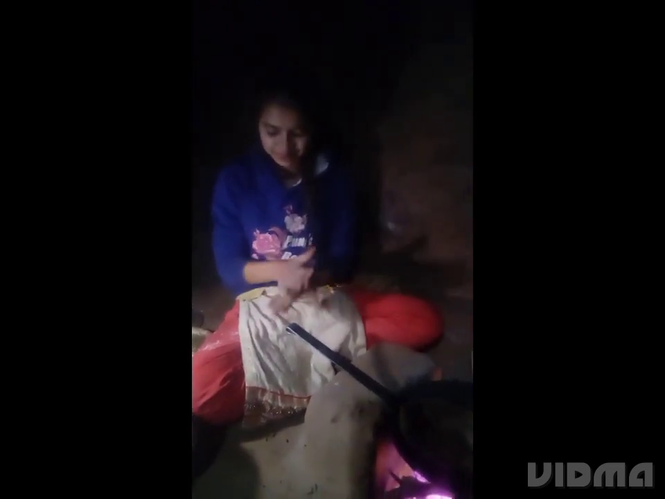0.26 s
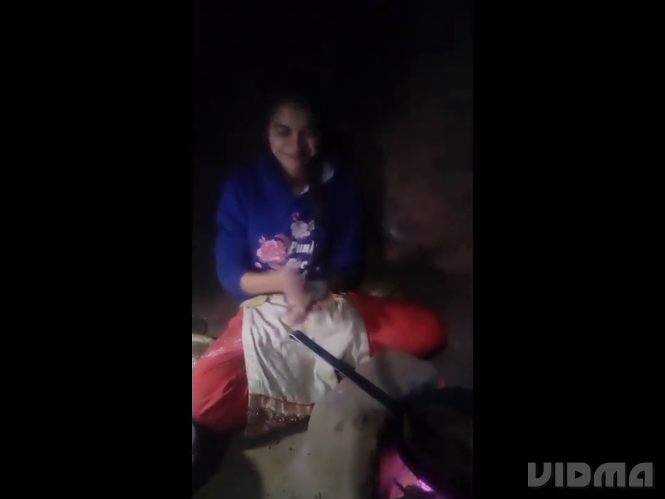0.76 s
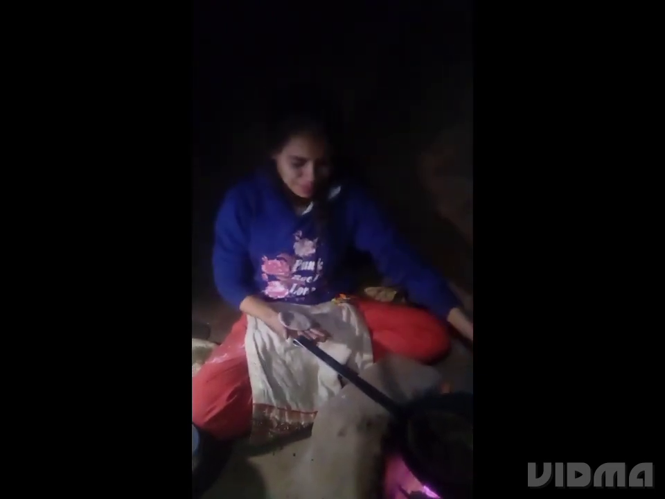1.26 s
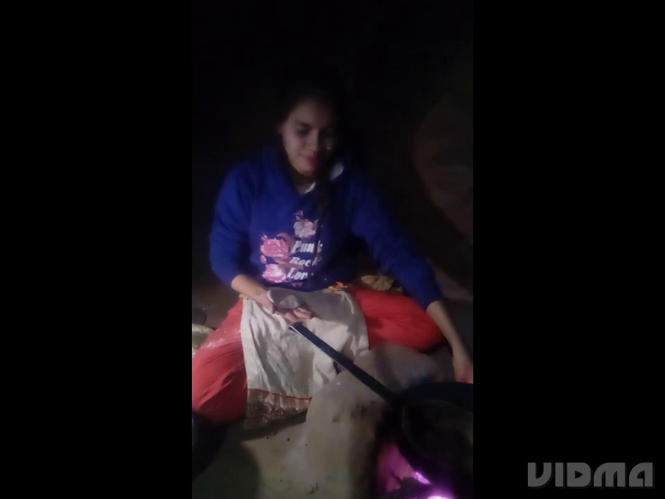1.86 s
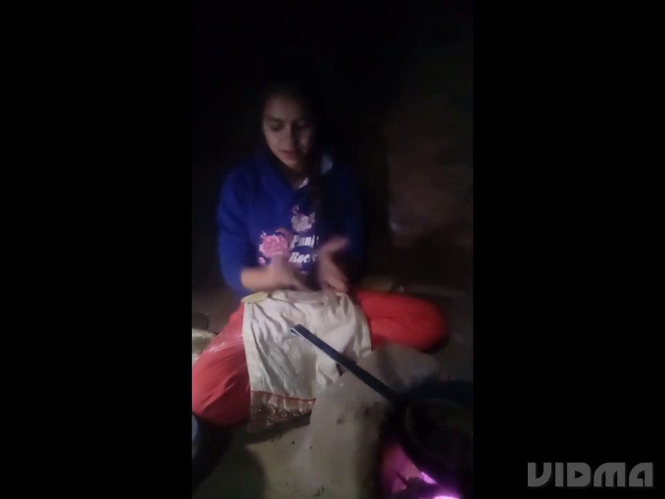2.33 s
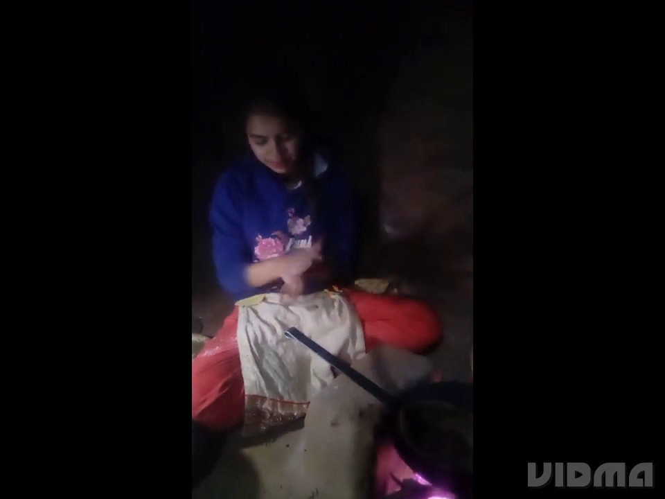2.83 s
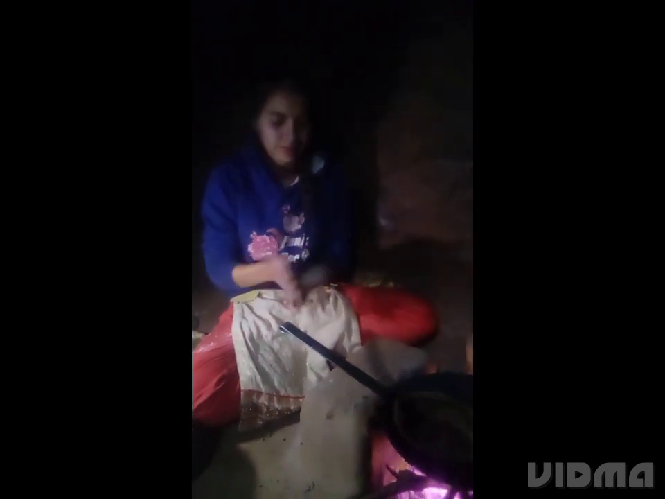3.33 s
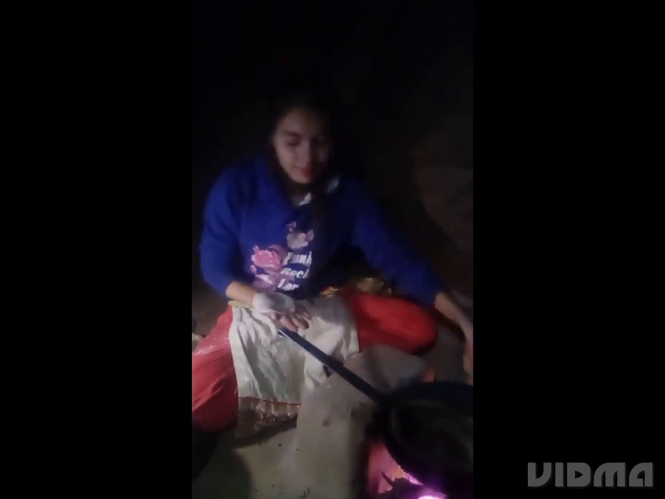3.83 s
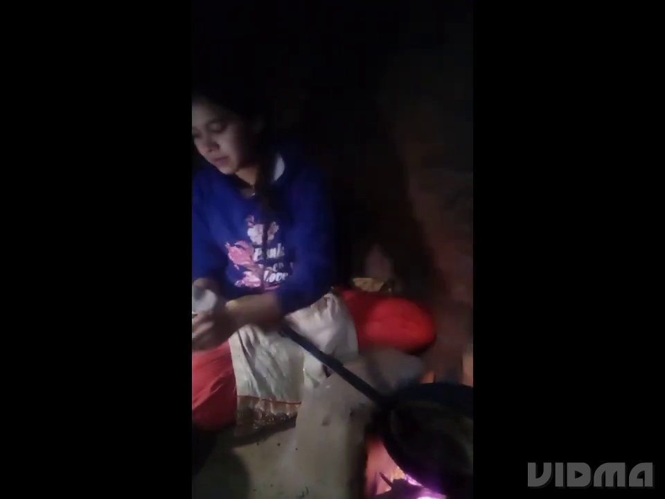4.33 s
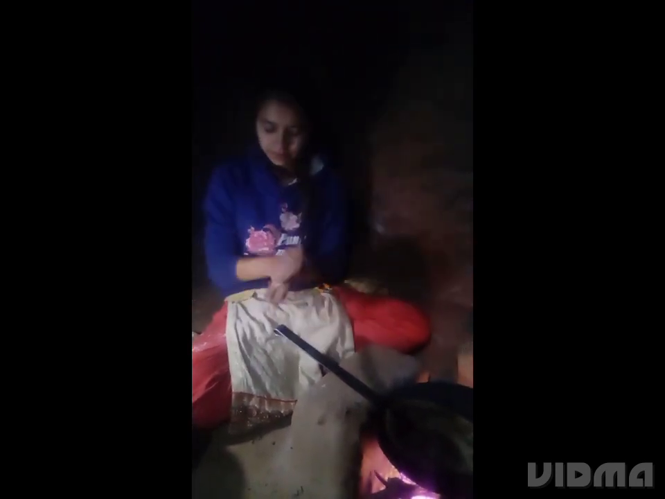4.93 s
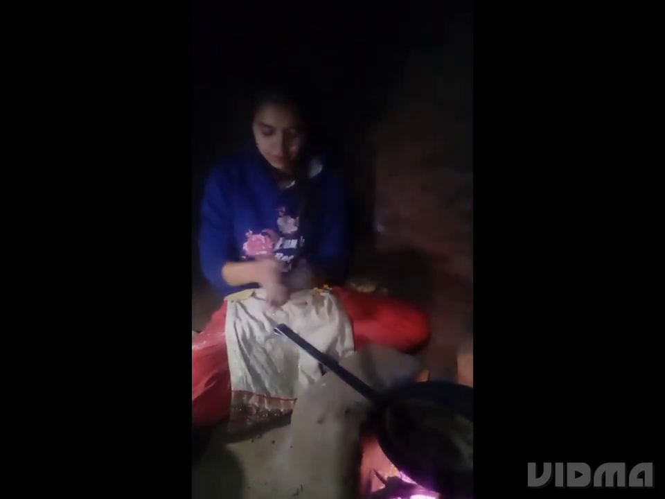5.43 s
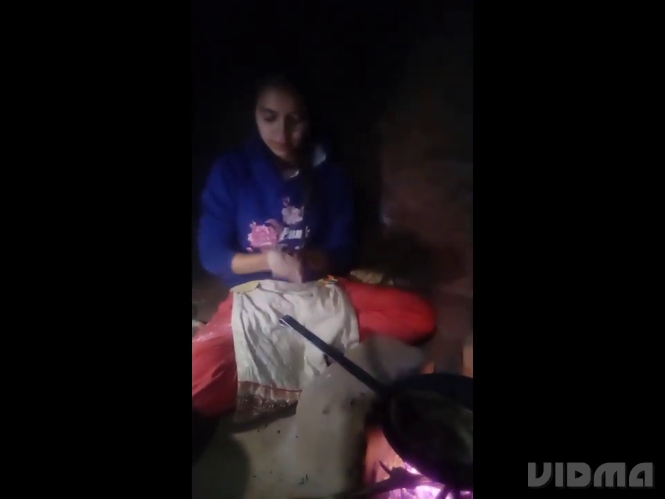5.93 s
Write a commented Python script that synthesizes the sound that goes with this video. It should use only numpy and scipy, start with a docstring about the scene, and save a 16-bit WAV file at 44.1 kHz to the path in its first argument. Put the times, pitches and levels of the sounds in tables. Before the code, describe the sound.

Close, nearly dry sound in a small quiet kitchen. Dough is patted between two floury palms about eight times a second, each pat a brief brushing hiss with occasional light slaps. The pats thin out as a hand reaches away with dull rubbing, resume, break once more, then continue firmer with soft low thumps. A wood fire murmurs and snaps sparsely.

```python
"""In a small quiet kitchen, a ball of dough is patted flat from palm to palm beside a wood fire.
Each pat is a hissing brush of skin over floury dough, made of clumped noise; firm contacts add slaps that
ring trapped air, and cupped palms add soft low thumps that bounce and sway. Twice a hand reaches away with
a dull rubbing. The fire murmurs and snaps as gas pockets burst; a short room tail follows."""
import sys
import numpy as np
from scipy import signal
from scipy.io import wavfile
from scipy.ndimage import uniform_filter1d

SR = 44100
rng = np.random.default_rng(int(sys.argv[2]) if len(sys.argv) > 2 else 0)


def log_audio(samples):
    """Write samples as a 16-bit WAV file to the path given in sys.argv[1]."""
    # one column per channel
    frames = np.atleast_2d(samples).T
    # limit to full scale, then quantise
    limited = np.clip(frames, -1, 1)
    pcm = np.round(limited * 32767).astype(np.int16)
    wavfile.write(sys.argv[1], SR, pcm)


N = 272538  # length in samples

# dough landing in a cupped palm: t/s, relative level/dB, central pitch f/Hz
THUMPS = [(1.156, -53, 76), (1.188, -48, 104), (1.418, -40, 106), (1.7, -43.5, 137.4),
          (1.951, -28.5, 174.7), (2.126, -46.5, 128.4), (2.255, -47, 156), (2.401, -31.5, 141.6),
          (2.934, -33, 105.5), (2.95, -37.5, 190), (3.304, -29.5, 181.5), (3.542, -35.5, 104.6),
          (4.434, -33.5, 185), (4.588, -35, 141), (4.654, -45.5, 183), (4.752, -24, 179),
          (4.869, -30.5, 158), (5.033, -40, 157), (5.103, -39.5, 332), (5.198, -23, 179.6),
          (5.321, -30, 167.6), (5.638, -26, 161.7), (5.746, -29, 181.4), (6.095, -30.5, 180)]
# bright hiss of skin on floury dough: f/Hz, relative density/dB
HISS = [(400, -20.5), (1000, -23), (1800, -3), (2600, -0.5), (3700, -6), (4300, -14), (5200, -31.5),
        (6800, -48), (8000, -60)]


def amp(db):
    """Decibels to gain."""
    return 10 ** (np.asarray(db) / 20)


def unit(x):
    """Scales to an rms of 1."""
    return x / np.sqrt(np.mean(x ** 2) + 1e-20)


def read(points, hz):
    """Joins points by straight lines over log frequency."""
    f, value = np.transpose(points)
    return np.interp(np.log(hz + 1), np.log(f + 1), value)


def add(mix, s, sound):
    """Lays a sound into the mix at time s."""
    part = mix[max(round(s * SR), 0):][:len(sound)]
    part += sound[:len(part)]


def colour(x, spectrum, size=4096):
    """Causal (minimum-phase) filter of unit energy with the given spectrum."""
    hz = abs(np.fft.fftfreq(size, 1 / SR))
    log_gain = np.log(amp(read(spectrum, hz)))
    response = np.exp(np.conj(signal.hilbert(log_gain)))
    taps = np.fft.ifft(response).real[:size // 2]
    return signal.oaconvolve(x, taps / np.linalg.norm(taps))[:len(x)]


def resonate(x, hz, width_hz):
    """One resonance with a peak gain of 1."""
    return signal.lfilter(*signal.iirpeak(hz, hz / width_hz, SR), x)


def grains(count, clumping_db=3.0, size=40):
    """Noise whose strength varies in clumps about size samples long, like grit under skin."""
    clumps = unit(uniform_filter1d(rng.standard_normal(count), size))
    return unit(rng.standard_normal(count) * amp(clumping_db * clumps))


def stroke(length, rise, sag_db, release):
    """Envelope of a contact: it builds, sags while it lasts, and dies when the hand lifts (times in s)."""
    t = np.arange(SR // 4) / SR
    held = np.minimum(t / length, 1)
    lifted = np.maximum(t - length, 0)
    return (1 - np.exp(-(t / rise) ** 2)) * amp(sag_db * (.5 - held) - 60 * lifted / release)


def room(x, size=256):
    """A short tail of sparse reflections, each band dying at its own speed."""
    # decay of the room: f/Hz, time to fall by 60 dB/s
    decay_times = [(60, 0.9), (200, 0.29), (600, 0.092), (2500, 0.11), (6000, 0.12)]
    count = SR // 2
    taps = rng.choice([-1, 1], count) * (rng.random(count) < 2500 / SR)  # about 2500 reflections a second
    taps[:SR // 250] = 0  # none within the first 4 ms
    hz, t, bands = signal.stft(taps, SR, nperseg=size)
    fade = amp(-60 * t / read(decay_times, hz)[:, None])
    tail = signal.istft(bands * fade, SR, nperseg=size)[1]
    return signal.fftconvolve(x, tail / np.linalg.norm(tail))[:N]


def ambience(level_db=-68, flutter_db=3.5):
    """The low, gently wavering murmur of the fire and the room: coloured noise with a drifting level."""
    # murmur: f/Hz, relative density/dB
    murmur_spectrum = [(25, -10), (60, 2), (170, 0), (290, -12.5), (500, -6.5), (650, -15.5), (1100, -15),
                       (1800, -17.5), (3400, -30), (5000, -46), (15000, -55)]
    waver = uniform_filter1d(rng.standard_normal(N), size=3000)
    waver = unit(uniform_filter1d(waver, size=1500))
    return amp(level_db + flutter_db * waver) * unit(colour(rng.standard_normal(N), murmur_spectrum))


def fire(echo_s=0.0009, echo=0.58, fizz_db=-21, fizz_t60=0.027):
    """A gas pocket bursts in the wood: a pulse, its rebound, and a short fizz."""
    # snaps of the burning wood: t/s, relative level/dB
    snap_events = [(1.464, -40), (1.727, -32.5), (1.7651, -22.5), (2.122, -38), (2.4682, -25),
                   (2.61, -15.5), (3.2228, -36.5), (3.378, -18), (3.9459, -32), (4.732, -18), (5.001, -36),
                   (5.247, -18), (5.3589, -30.5)]
    # snap: f/Hz, relative density/dB
    snap_spectrum = [(80, -19.5), (500, -6.5), (900, -10), (1550, 4), (2200, -5), (2850, 0), (3500, -8.5),
                     (4500, -11.5), (6000, -33.5), (8300, -53), (15000, -51.5), (16200, -65.5)]
    out, t = np.zeros(N), np.arange(SR // 20) / SR
    for s, db in snap_events:
        pop = amp(fizz_db - 60 * t / fizz_t60) * rng.standard_normal(len(t))
        pop[0] -= 1  # the pulse
        pop += echo * np.sinc((t - echo_s) * SR)  # the rebound, of opposite sign
        add(out, s, amp(db) * pop)
    return amp(11.5) * colour(out, snap_spectrum)


def scuffs(landing_db=-29, landing_s=0.0099, wander=0.033):
    """Dull, lumpy rubbing: one broad resonance that shifts from stroke to stroke, under a faint fizz."""
    # separate short scuffs: t/s, length/s, relative level/dB
    short_scuffs = [(1.951, 0.01, -33), (2.025, 0.021, -41), (2.783, 0.14, -60), (4.581, .018, -43),
                    (5.274, 0.047, -50.5), (5.571, 0.043, -58.5), (5.701, 0.019, -51), (5.895, .03, -46.5)]
    # rubbing of hand, flour and cloth, one curve for each reach of the arm: t/s, level/dB
    reach_curves = [
        [(1.37, -54.5), (1.49, -62.5), (1.59, -51), (1.625, -61.5), (1.67, -41.5), (1.78, -62.5), (1.85, -59),
         (1.91, -76), (2.0, -59), (2.1, -50), (2.17, -55.5), (2.21, -43), (2.27, -69)],
        [(3.74, -75.5), (3.77, -48.5), (3.82, -76), (3.9, -60.5), (3.99, -51), (4.04, -75.5)],
    ]
    # scuff: f/Hz, relative density/dB
    scuff_spectrum = [(60, -4), (280, -16), (400, 2), (500, 3.5), (640, -0.5), (850, -11), (1300, -19.5),
                      (3500, -35), (5500, -76.5)]
    # each landing of the dough also scuffs the palm, landing_db relative to its thump
    landings = [(s, landing_s, db + landing_db) for s, db, _ in THUMPS]
    strokes = []
    for s, length, db in list(short_scuffs) + landings:
        strokes.append((s, amp(db) * stroke(length, rise=0.0027, sag_db=4.0, release=0.076)))
    for curve in reach_curves:
        s, db = np.transpose(curve)
        t = np.arange(s[0], s[-1], 1 / SR)
        strokes.append((s[0], amp(np.interp(t, s, db))))
    out = np.zeros(N)
    for s, pressure in strokes:
        shift = 1 + wander * (2 * rng.random() - 1)  # up to 3.3 % either way
        shifted = [(f * shift, level) for f, level in scuff_spectrum]
        rub = colour(pressure * grains(len(pressure), clumping_db=4.0, size=400), shifted)
        add(out, s, unit(rub) * np.sqrt(np.mean(pressure ** 2)))  # keeps the rms of the pressure
    return out


def fingers(per_s=5, top_db=-72, spread_db=3.0):
    """Faint stray touches of the fingertips at random times: grainy noise with the hiss of the pats."""
    pressure = np.zeros(N)
    for when, length, strength in rng.random((round(per_s * N / SR), 3)):
        touch = stroke(0.014 + 0.1 * length, rise=0.0078, sag_db=9, release=0.067)
        touch_db = top_db + spread_db * (2 * strength - 2)
        add(pressure, when * N / SR, amp(touch_db) * touch)
    return colour(pressure * grains(N, clumping_db=6.5), HISS)


def thumps(sway_hz=61, sway_t60=0.28, ring_t60=0.11, ring_db=-14, glide=0.046, wobble=0.053,
           flesh_db=-10, flesh_t60=0.037):
    """The soft mass bounces unevenly in the palm, its pitch sinking, and leaves a deep sway behind."""
    # flesh noise of a landing: f/Hz, relative density/dB
    flesh_spectrum = [(40, -10.5), (130, 8.5), (270, -2.5), (420, -4), (800, -19.5), (2000, -24),
                      (5000, -82)]
    base_hz, base_s, stretch = 170, 0.024, 0.94  # push length up to that pitch; exponent of growth above it
    base_sway_db, sway_db_per_oct = -38, -1  # sway at base_hz; lower landings sway more
    out, t = np.zeros(N), np.arange(SR // 3) / SR
    for s, db, hz in THUMPS:
        length = base_s * max(hz / base_hz, 1) ** stretch
        push = np.minimum(t / length, 1)
        ring = amp(ring_db) * push * amp(-60 * np.maximum(t - length, 0) / ring_t60)
        swell = abs(np.sin(np.pi * push ** 0.71)) + ring
        wander = unit(uniform_filter1d(rng.standard_normal(len(t)), size=200))
        # the pitch sinks as the dough settles
        turns = np.cumsum(hz * (1 + glide * (.5 - push) + wobble * wander)) / SR
        flesh_level = amp(flesh_db) * swell + amp(-20.5 - 60 * t / flesh_t60) * push
        flesh = flesh_level * unit(colour(rng.standard_normal(len(t)), flesh_spectrum))
        sway_turns = np.cumsum(sway_hz * (1 + 0.24 * wander)) / SR
        sway_db = base_sway_db + sway_db_per_oct * np.log2(hz / base_hz)
        sway = push * amp(sway_db - 60 * t / sway_t60) * np.sin(2 * np.pi * sway_turns)
        bounce = swell * np.sin(2 * np.pi * turns)
        add(out, s, amp(db) * (bounce + flesh) + sway)  # the sway does not follow the thump's level
    return amp(0.9) * out


def slaps(rise=0.00066, pocket_width_hz=160, pocket_db=0, palm_echo=0.32):
    """Skin meets dough in a cluster of tiny contacts, which ring the air trapped between them."""
    # firm contacts: t/s, relative level/dB, air pocket f/Hz, crisp treble level relative to the slap/dB
    slap_events = [(0.365, -39, 1023, -4), (0.7312, -44.5, 1210, 4), (0.861, -33.5, 930, -5.5),
                   (0.984, -37, 448, -7.5), (1.3216, -37.5, 796, -11.5), (2.262, -24, 1490, -10.5),
                   (2.731, -44.5, 970, 3), (2.852, -30, 2090, -4), (3.183, -38.5, 1018, 4),
                   (3.414, -36, 1426, -8), (4.388, -45.5, 2205, -13.5), (4.5739, -29.5, 512, -9),
                   (4.711, -36.5, 1350, -12.5), (5.185, -32, 1900, -16), (5.399, -37, 1620, -10),
                   (5.4105, -34, 874, -13.5), (5.6334, -29.5, 1484, -3.5), (5.849, -37, 1560, 0),
                   (5.857, -31.5, 1680, -5.5), (6.059, -40.5, 930, -13)]
    # smack: f/Hz, relative density/dB
    smack_spectrum = [(60, -0.5), (250, -4), (550, -0.5), (1600, 5.5), (2400, -7), (4000, -35.5),
                      (5500, -68)]
    # crisp edge: f/Hz, relative density/dB
    crisp_spectrum = [(1200, -26), (2700, 9.5), (3800, 4.5), (4500, -9.5), (5300, -36), (7000, -32.5),
                      (8300, -63)]
    ordinary_db, ordinary_t60 = -34.5, 0.03  # an ordinary slap and its decay in s
    damping = 0.24  # dB by which the decay shortens per dB of extra force
    out, t = np.zeros(N), np.arange(SR // 8) / SR
    for s, db, hz, crisp_db in slap_events:
        force_db = db - ordinary_db
        t60 = ordinary_t60 * amp(-damping * force_db)
        contact = (1 - np.exp(-t / rise)) * amp(-60 * t / t60)
        burst = contact * grains(len(t), clumping_db=5.5, size=20)
        add(burst, 1 / hz, palm_echo * burst.copy())  # the hollow of the palm sends it back one period later
        smack = colour(burst, smack_spectrum)
        pocket = unit(resonate(smack, hz, pocket_width_hz))
        hollow = unit(unit(smack) + amp(pocket_db) * pocket)
        sound = hollow + amp(crisp_db) * unit(colour(burst, crisp_spectrum))
        add(out, s, amp(db) * sound * np.std(contact))
    return amp(7.0) * out


def brushes(palm_echo=0.41):
    """Floury skin slides on dough: a bright hiss over a duller body, tinted by the gap between the palms."""
    # pats from palm to palm: t/s, relative hiss level/dB, body relative to hiss/dB
    pat_events = [(.004, -38.5, -13), (0.131, -59, 6), (.259, -57.5, -5), (.357, -51, 0.5),
                  (0.485, -50.5, -6.5), (0.607, -57, 1.5), (0.726, -58.5, -14.5), (0.838, -54, -3),
                  (1.094, -46, -4), (1.19, -68.5, 4.5), (1.32, -52, 11.5), (1.572, -70.5, 19.5),
                  (1.773, -53.5, -9), (2.254, -51.5, 16.5), (2.38, -47.5, 5), (2.496, -51.5, 1),
                  (2.628, -39, -7.5), (2.729, -51, 3), (2.854, -39.5, -8.5), (2.947, -45.5, 1.5),
                  (3.077, -53, -8), (3.176, -43, -5), (3.301, -52.5, 7), (3.386, -55.5, -3.5),
                  (3.494, -55.5, 1), (3.812, -57, -4.5), (4.197, -51, -3), (4.385, -48, 1.5),
                  (4.568, -65.5, 13), (4.709, -55.5, 10.5), (4.837, -57, 2.5), (4.935, -46.5, -5),
                  (5.063, -47, 3), (5.184, -58, 19.5), (5.51, -48, 1), (5.629, -51, 10), (5.738, -56, 3),
                  (5.844, -50, 9.5), (5.958, -51, 5), (6.059, -47, 3.5), (6.156, -59, -1)]
    # dough sliding round on the palm between pats: t/s, length/s, relative hiss level/dB, body re hiss/dB
    slide_events = [(0.896, 0.042, -55, -4.5), (0.958, 0.17, -59, -19), (1.427, 0.045, -71.5, 12),
                    (1.669, 0.044, -52.5, -4.5), (2.093, 0.065, -60.5, -2), (2.408, 0.046, -60.5, 9.5),
                    (3.524, 0.055, -59, 8), (3.954, 0.059, -58.5, -2), (4.972, 0.055, -58.5, 3.5),
                    (5.243, 0.091, -57.5, 5.5), (5.37, 0.071, -55.5, 2)]
    # duller body of the brush: f/Hz, relative density/dB
    body_spectrum = [(30, -6.5), (130, 6), (240, -9), (560, 1), (740, -4.5), (970, 0.5), (1500, -2),
                     (2200, -5.5), (4000, -34.5), (5500, -69)]
    pat_s, shortening = 0.033, 0.071  # contact time with body equal to hiss; dB it shortens per dB of body
    hiss, body = np.zeros(N), np.zeros(N)
    pats = [(s, pat_s * amp(-shortening * body_db), db, body_db) for s, db, body_db in pat_events]
    for s, length, db, body_db in pats + list(slide_events):
        pressure = amp(db) * stroke(length, rise=.002, sag_db=10.5, release=0.043)
        gap = round(SR * rng.uniform(.0008, .0022))  # round trip to the facing palm, new with each contact
        for layer, gain in ((hiss, 1), (body, amp(body_db))):
            rub = pressure * grains(len(pressure), clumping_db=2.0)
            add(layer, s, gain * rub)
            add(layer, s + gap / SR, -palm_echo * gain * rub)
    return amp(-1.6) * colour(hiss, HISS) + amp(-0.16) * colour(body, body_spectrum)


def scene():
    """Hands and fire close by, in a nearly dry room."""
    near = brushes() + slaps() + fingers() + scuffs() + fire()
    low = thumps()
    reflections = amp(-18.5) * room(near) + amp(-21.0) * room(low)
    return (near + low + reflections + ambience())[None]


def record(dry, edge_hz=16200):
    """Limits the top of the band with a steep linear-phase low-pass."""
    low_pass = signal.firwin(511, edge_hz, window=("kaiser", 9), fs=SR)
    return signal.oaconvolve(dry, low_pass[None], "same")


dry = scene()
out = record(dry)
log_audio(out)
```